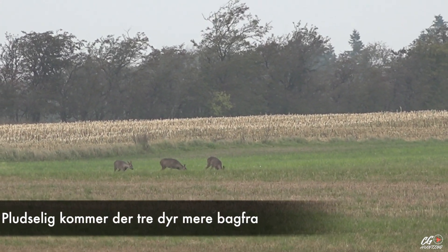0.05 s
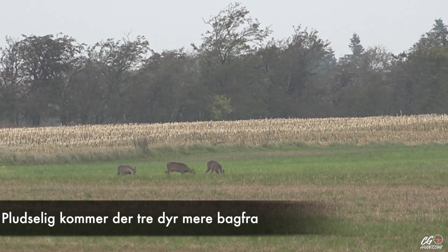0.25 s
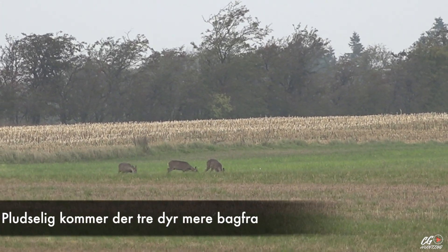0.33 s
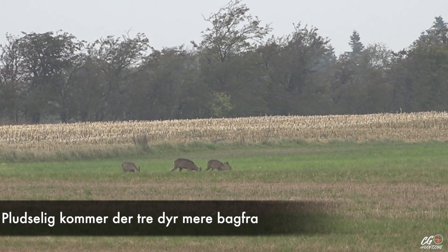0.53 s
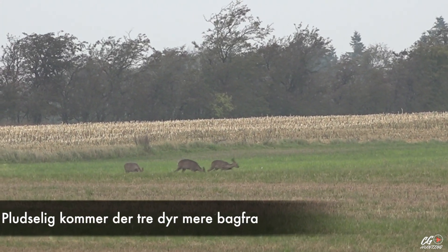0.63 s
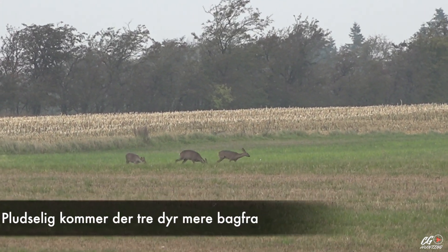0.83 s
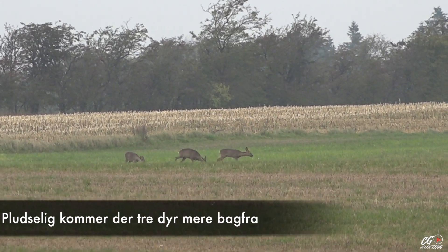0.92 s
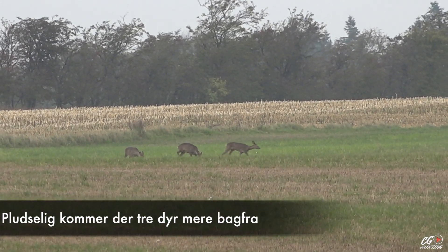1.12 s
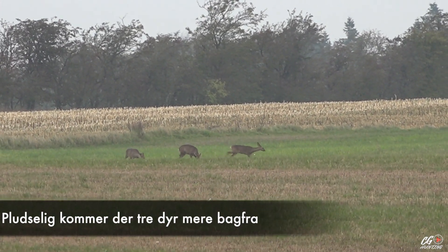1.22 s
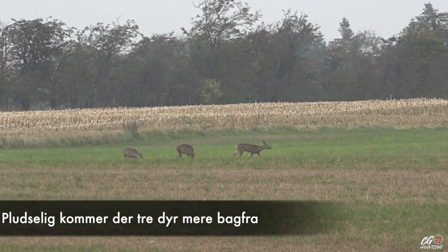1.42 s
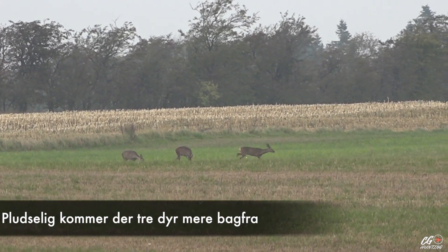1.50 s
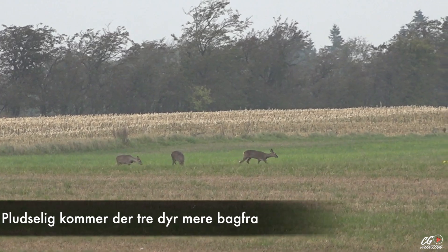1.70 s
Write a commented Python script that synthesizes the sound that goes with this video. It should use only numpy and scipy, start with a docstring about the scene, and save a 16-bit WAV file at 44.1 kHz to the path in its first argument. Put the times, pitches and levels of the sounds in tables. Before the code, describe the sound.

Gusty wind buffets the microphone while a small bird gives two quick, high calls.

```python
"""A small bird in a windy field

Gusts buffet the microphone over the steady rush of far trees at the edge of an open field.
A small bird gives two quick, high calls: rising chips, a falling whistle, then a stuttering
run down in pitch. One faint tick sounds close by between the calls.
Wind and trees are mostly shaped noise; the bird is a pure tone that slides in pitch."""
import sys
import numpy as np
from scipy import signal
from scipy.fft import rfft, irfft, next_fast_len
from scipy.io import wavfile
from scipy.ndimage import uniform_filter1d, map_coordinates

SR = 44100
rng = np.random.default_rng(int(sys.argv[2]) if len(sys.argv) > 2 else 0)


def dump(signal):
    """Clip the signal to [-1, 1] and save it as 16-bit WAV at the path in sys.argv[1]."""
    limited = np.clip(np.atleast_2d(signal).T, -1, 1)
    pcm = np.round(limited * 32767).astype(np.int16)
    wavfile.write(sys.argv[1], SR, pcm)


N = 77175  # 1.75 seconds


def amp(db):
    """Turn decibels (dB) into a number to multiply a sound by."""
    return 10 ** (np.asarray(db) / 20)


def unit(x):
    """Scale a sound so that its average strength (rms) is 1."""
    return x / np.sqrt(np.mean(x ** 2) + 1e-20)


def curve(rows):
    """Join (seconds, value) points with straight lines, giving one value per sample."""
    return np.interp(np.arange(N) / SR, *np.transpose(rows))


def wobble(per_second):
    """A smooth curve through this many random points a second."""
    points = rng.standard_normal(int(N * per_second / SR) + 4)
    return map_coordinates(points, [np.arange(N) * per_second / SR])


def filtered(x, response):
    """Multiply each frequency in a sound by response(frequency)."""
    size = next_fast_len(N + SR // 2)
    hz = np.fft.rfftfreq(size, 1 / SR)
    return irfft(rfft(x, size) * response(hz), size)[..., :N]


def coloured(x, colour):
    """Turn frequencies up or down along a line through (Hz, dB) points."""
    points_hz, db = np.transpose(colour)
    return filtered(x, lambda hz: amp(np.interp(np.log(hz + 1), np.log(points_hz + 1), db)))


def noise(colour):
    """Noise of strength 1 with the given colour, its mix of low and high frequencies."""
    return unit(coloured(rng.standard_normal(N), colour))


def hiss():
    """A very faint hiss, separate for left and right."""
    # Each row: frequency in Hz, relative level in dB.
    colour = [(300, 0), (1000, 0), (4000, 0), (8000, -7), (13000, -9)]
    return amp(-86.5) * np.array([noise(colour), noise(colour)])


def trees():
    """The far wood rushes almost steadily; its leaves add a hiss that swells a little more."""
    # Each row of both: frequency in Hz, relative level in dB.
    rush_colour = [(30, 1), (200, -2), (400, 2), (600, 2), (900, 2.5), (1250, -8), (1800, -11.5),
                   (3000, -13.5), (4600, -21), (6000, -21), (8000, -25.5), (15500, -31)]
    leaf_colour = [(300, -54.5), (1200, -17), (2800, 3), (4600, 25), (6000, 0), (9000, -24), (15000, -49)]
    sway_db, sway_per_second = .35, 6
    rush = amp(-54 + sway_db * wobble(sway_per_second)) * noise(rush_colour)
    leaves = amp(-72 + 2 * sway_db * wobble(sway_per_second)) * noise(leaf_colour)
    return rush + leaves


def eddies(colour):
    """Swirling air: noise with its own swells evened out, so that the gusts can set its level."""
    swirl = noise(colour)
    power = np.abs(signal.hilbert(swirl)) ** 2
    for _ in range(2):  # smooth twice, over about 16 milliseconds
        power = np.abs(uniform_filter1d(power, size=700))
    return unit(swirl / np.sqrt(power + 1e-3))


def buffeting():
    """Wind on the microphone: a steady breeze, a deep rumble in gusts, a flutter in the sharper ones."""
    # How the gusts rise and fall. Each row of both: time in seconds, relative level in dB.
    rumble_levels = [(0.03, -45.5), (0.082, -34), (0.106, -45), (0.188, -35), (0.216, -19.5), (0.244, -35),
                     (0.268, -16.5), (0.37, -27.5), (0.442, -24.5), (0.48, -37.5), (0.504, -21),
                     (0.522, -42), (0.542, -21.5), (0.618, -34.5), (0.728, -36), (0.776, -24), (0.862, -35),
                     (0.882, -50), (1.074, -28), (1.116, -40.5), (1.136, -30.5), (1.198, -29.5),
                     (1.232, -33), (1.27, -22.5), (1.342, -22.5), (1.366, -33), (1.4, -36), (1.49, -28),
                     (1.514, -42), (1.75, -38.5)]
    flutter_levels = [(0.03, -41.5), (0.12, -74), (0.202, -43), (0.408, -32.5), (0.508, -45), (0.546, -37),
                      (0.614, -59), (0.672, -35), (0.738, -55), (0.79, -35), (0.838, -62), (0.858, -33),
                      (0.91, -75), (0.94, -45), (0.982, -59), (1.012, -47), (1.04, -59), (1.088, -35.5),
                      (1.154, -64), (1.202, -33.5), (1.222, -51), (1.29, -28), (1.408, -68), (1.466, -25.5),
                      (1.524, -60), (1.75, -57)]
    # Each row of all three: frequency in Hz, relative level in dB.
    rumble_colour = [(12, -12), (28, -16), (48, -1.5), (65, 1), (95, -5.5), (140, -20), (220, -37),
                     (900, -120)]
    flutter_colour = [(70, 0), (115, 2.5), (155, 0), (220, -6.5), (300, -16), (420, -25), (700, -43.5),
                      (4000, -120)]
    breeze_colour = [(12, -14), (30, -5), (48, 0), (62, -4), (80, -13), (120, -23), (250, -45), (900, -120)]
    rumble = amp(curve(rumble_levels)) * eddies(rumble_colour)
    flutter = amp(curve(flutter_levels) + 2.5) * eddies(flutter_colour)
    breeze = amp(-42) * noise(breeze_colour)
    return breeze + rumble + flutter


def thumps():
    """Sharp swirls of air thump the microphone, each with a few waves of pressure that swell and fade."""
    # Each row: middle in seconds, length in seconds, pitch in Hz, level in dB.
    swirls = [ (.792, .03, 270, -42), (1.281, .02, 310, -34), (1.466, .022, 165, -18), ]
    sound = np.zeros(N)
    for middle, length, hz, db in swirls:
        t = np.arange(N) / SR - middle
        swell = np.cos(np.pi * np.clip(t / length, -.5, .5)) ** 2
        phase = rng.uniform(0, 2 * np.pi)
        sound += amp(db) * swell * np.sin(2 * np.pi * hz * t + phase)
    return sound


def tick():
    """A tiny, bright click close by: a burst of noise that dies at once."""
    # Each row: frequency in Hz, relative level in dB.
    colour = [(2000, -20), (6500, -1), (9000, -5), (12500, 0), (15500, -9)]
    start_s, fade_s = .8773, .004  # it drops 60 dB in fade_s
    t = np.arange(N) / SR - start_s
    burst = rng.standard_normal(N) * (t >= 0) * 1e-3 ** (np.abs(t) / fade_s)
    return amp(-46) * coloured(burst, colour)


def echo(sound):
    """The ground and leaves send back a thin, fading echo."""
    delay_s, fade_s = .005, .5  # it drops 60 dB in fade_s
    t = np.arange(SR // 2) / SR
    tail = rng.standard_normal(len(t)) * 1e-3 ** (t / fade_s) * (t > delay_s)
    return amp(-18) * signal.fftconvolve(sound, tail / np.linalg.norm(tail))[:N]


def voice(pitch_hz):
    """The bird's pure tone, wavering slightly around its pitch."""
    wavering_hz = pitch_hz * (1 + .006 * wobble(per_second=370))
    return np.sin(2 * np.pi * np.cumsum(wavering_hz) / SR)


def note(middle, length, hz, glide_hz, db, arch_hz):
    """One short bird note that swells and fades while its pitch slides along an arch."""
    position = np.clip((np.arange(N) / SR - middle) / length, -.5, .5)  # 0 at the note's middle
    swell = np.abs(np.cos(np.pi * position)) ** 1.68
    pitch_hz = hz + glide_hz * position - arch_hz * (2 * position) ** 2
    return amp(db) * swell * voice(pitch_hz)


def whistle(points):
    """The bird slides down in pitch without a break."""
    times, hz, db = np.transpose(points)
    t = np.arange(N) / SR
    fade_s = .002
    fade_in_out = np.clip(np.minimum(t - times[0], times[-1] - t) / fade_s, 0, 1)
    return fade_in_out * amp(np.interp(t, times, db)) * voice(np.interp(t, times, hz))


def bird():
    """Two calls, each made of rising chips, a falling whistle and a stuttering run downward."""
    # Each row: middle in seconds, pitch in Hz, rise in Hz, level in dB.
    opening_chips = [ (.6172, 5300, 900, -51), (.6255, 5150, 900, -44), (.6353, 5000, 1200, -45),
                     (.6451, 5000, 900, -46), (.654, 5100, 600, -58), (1.4435, 4980, 1000, -51),
                     (1.454, 4600, 1500, -41), (1.4633, 3850, 1500, -41), ]
    # One list for each whistle. Each row: time in seconds, pitch in Hz, level in dB.
    whistle_paths = [
        [(.665, 6550, -65), (.671, 6400, -60), (.682, 6100, -59), (.690, 5650, -57), (.696, 5280, -48),
         (.700, 4950, -51), (.704, 4800, -60)],
        [(1.487, 6550, -60), (1.492, 5800, -53), (1.503, 5280, -47), (1.512, 4950, -48), (1.516, 4880, -57),
         (1.522, 4750, -54), (1.528, 4050, -57)],
    ]
    # Each row: middle in seconds, length in seconds, pitch in Hz, fall in Hz (minus rises), level in dB.
    closing_notes = [(.709, .012, 4830, 195, -61), (.721, 0.01, 4600, 196, -60),
                     (0.729, 0.0086, 4400, 202, -58), (.743, 0.011, 4260, 108, -58.5),
                     (0.7645, 0.015, 3850, 300.5, -59.5), (0.774, 0.0064, 3630, 293.5, -51),
                     (0.783, 0.023, 3380, 354.5, -53.5), (1.53, 0.0089, 4050, 109, -55),
                     (1.5393, 0.0062, 4500, -400, -48), (1.557, .0095, 4350, -13.5, -41),
                     (1.5734, 0.009, 3960, -100, -38), (1.5857, 0.013, 3960, 354.5, -44),
                     (1.596, .012, 3490, 854.5, -39), (1.6063, 0.0054, 3080, -5, -52)]
    chip_s, waver_db = .005, .8
    chips = sum(note(middle, chip_s, hz, rise, db, arch_hz=550)
                for middle, hz, rise, db in opening_chips)
    whistles = sum(whistle(points) for points in whistle_paths)
    runs = sum(note(middle, length, hz, -fall, db, arch_hz=570)
               for middle, length, hz, fall, db in closing_notes)
    return (chips + whistles + runs) * amp(waver_db * wobble(per_second=320))


def panned(sound):
    """Spread one sound to left and right, leaning slightly right except in the highest treble."""
    # Each row: frequency in Hz, left level minus right level in dB.
    balance = [(400, -1.5), (1200, -1), (4500, -1.1), (8000, -.2)]
    left = coloured(sound, [(hz, db / 2) for hz, db in balance])
    right = coloured(sound, [(hz, -db / 2) for hz, db in balance])
    return np.array([left, right])


def scene():
    """Mix the wind, trees, tick and echoing bird, then spread them over the faint stereo hiss."""
    calls = bird()
    field = buffeting() + thumps() + trees() + tick() + calls + echo(calls)
    return panned(field) + hiss()


def record(dry):
    """Cut away the very highest treble."""
    return filtered(dry, lambda hz: hz < 15750)


dry = scene()
out = record(dry)
dump(out)
```